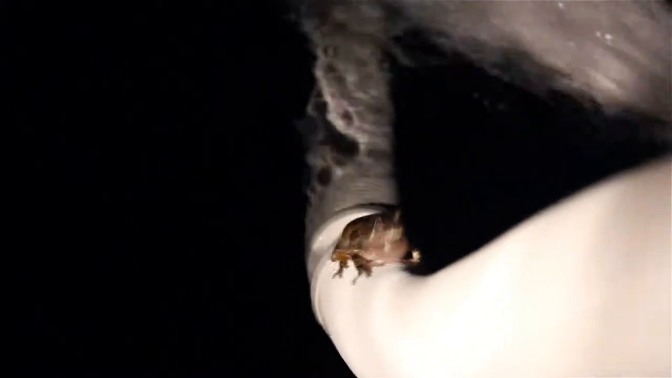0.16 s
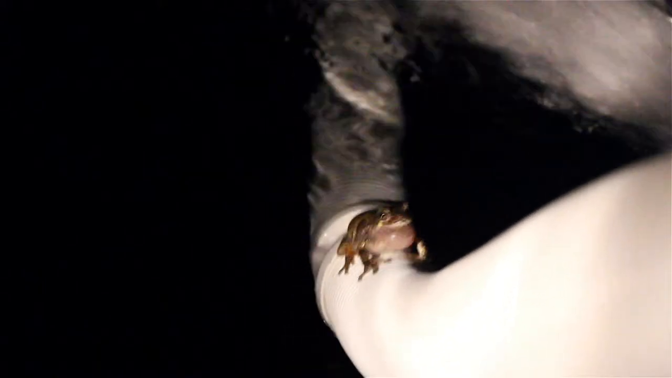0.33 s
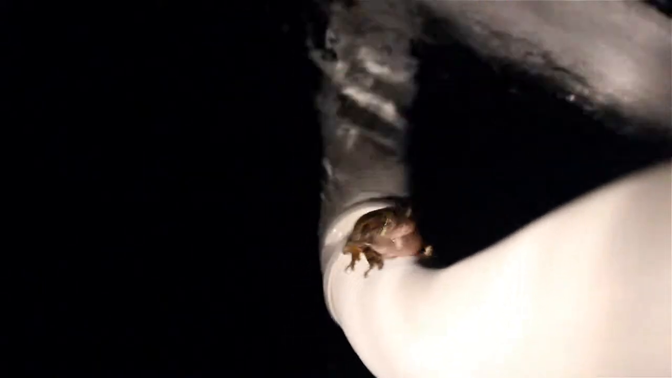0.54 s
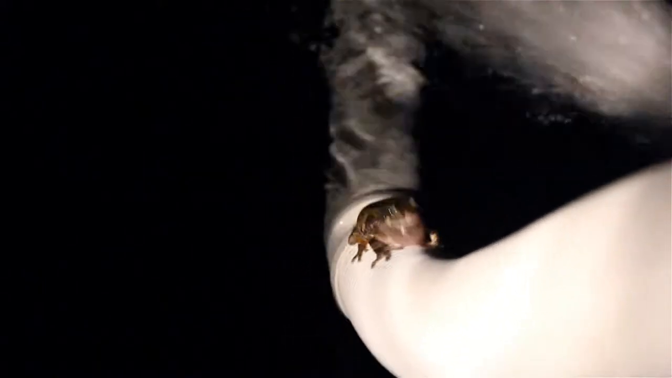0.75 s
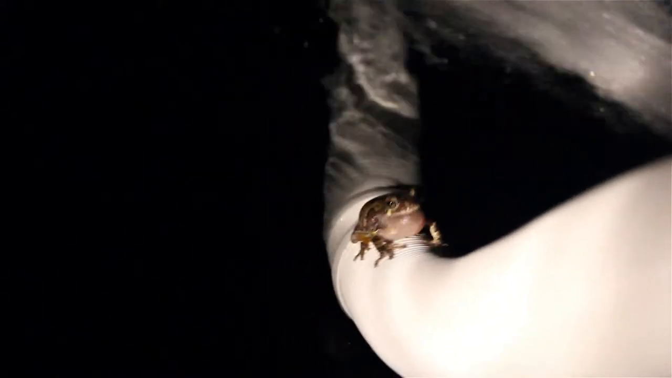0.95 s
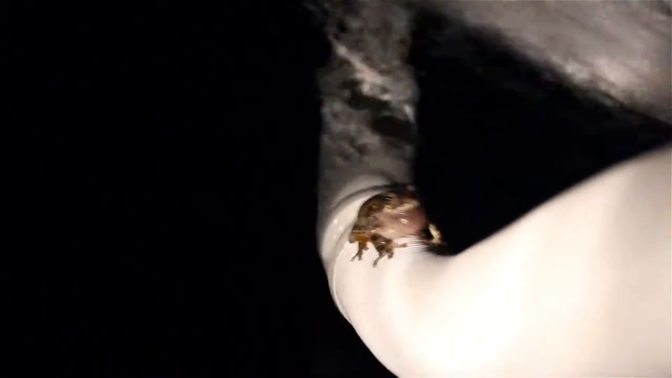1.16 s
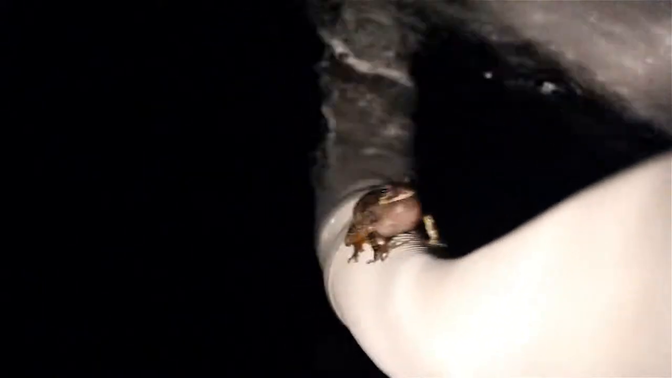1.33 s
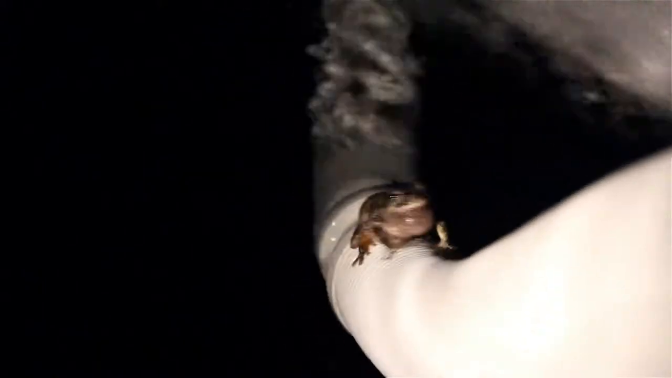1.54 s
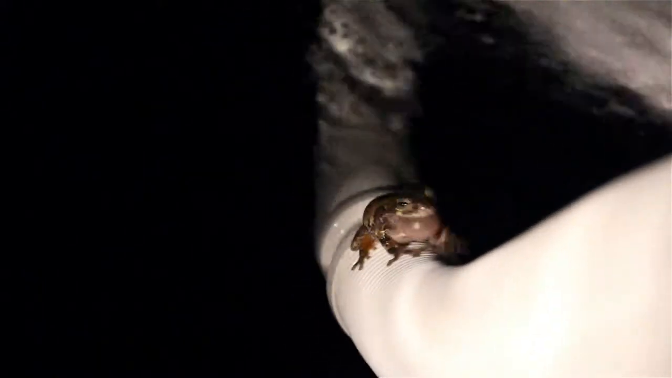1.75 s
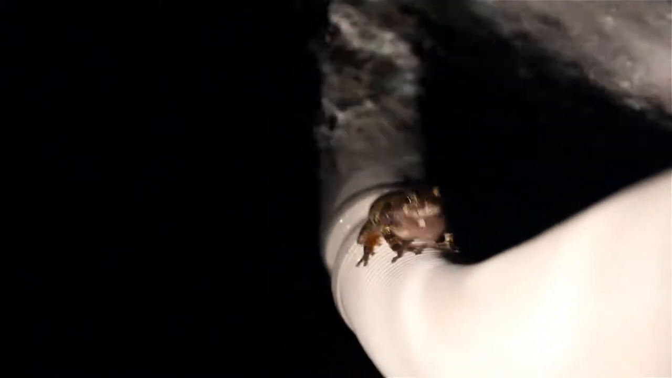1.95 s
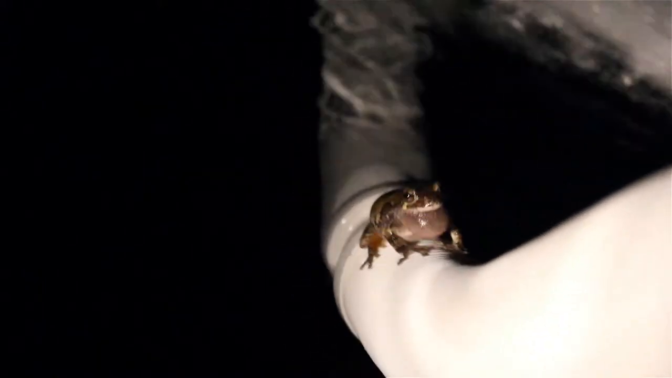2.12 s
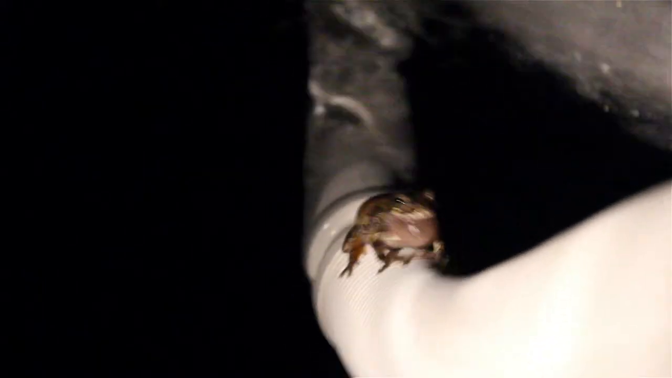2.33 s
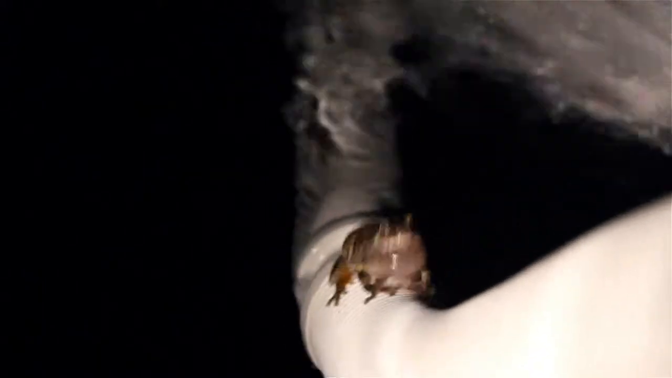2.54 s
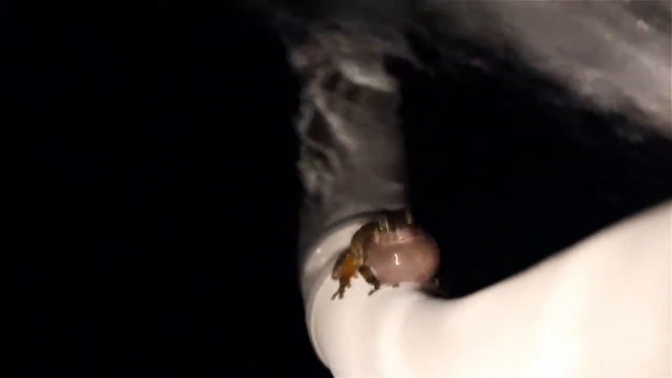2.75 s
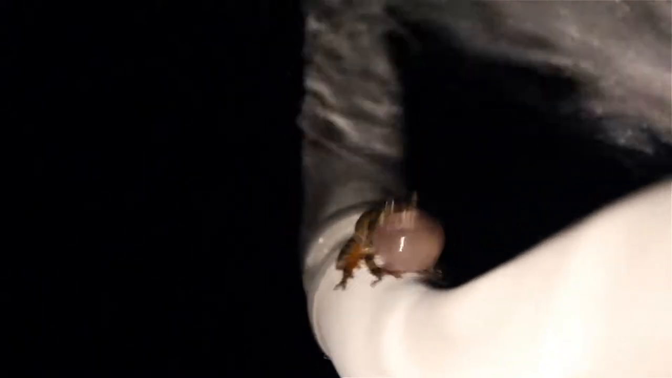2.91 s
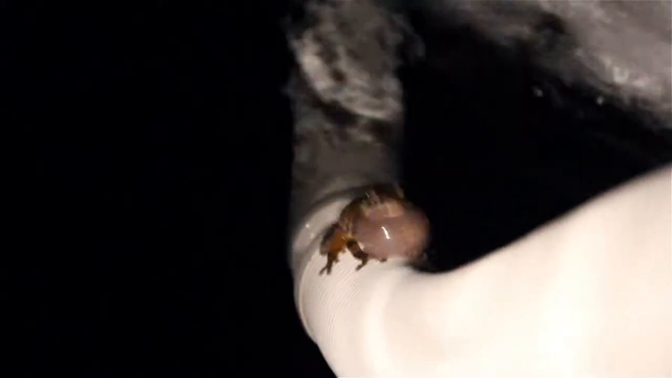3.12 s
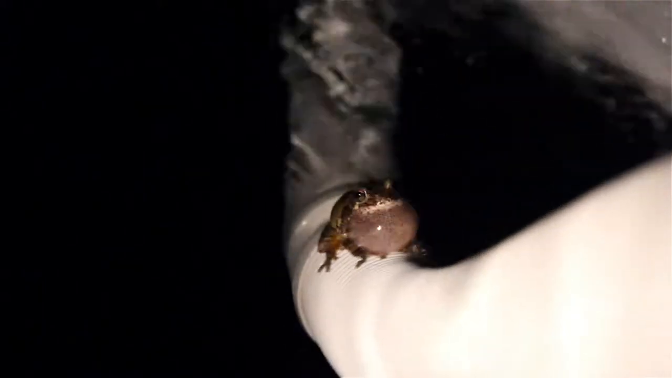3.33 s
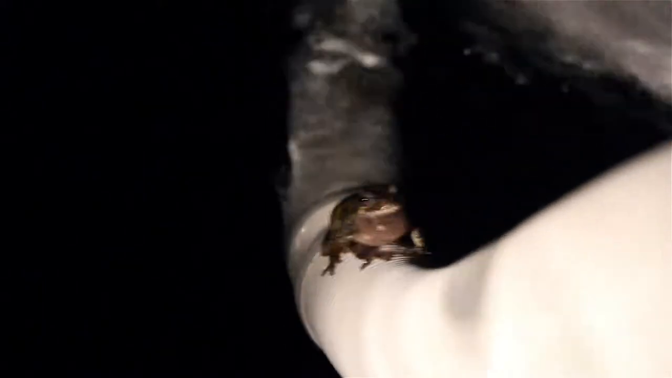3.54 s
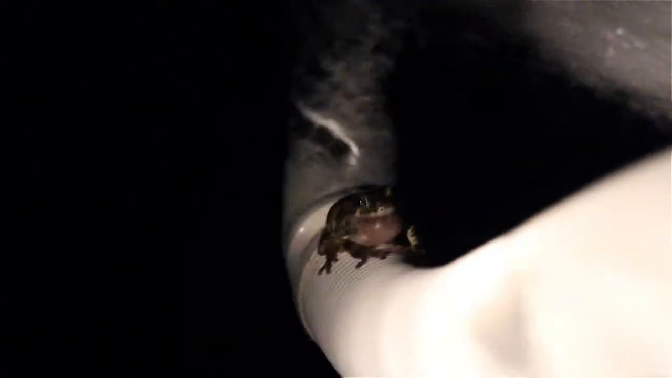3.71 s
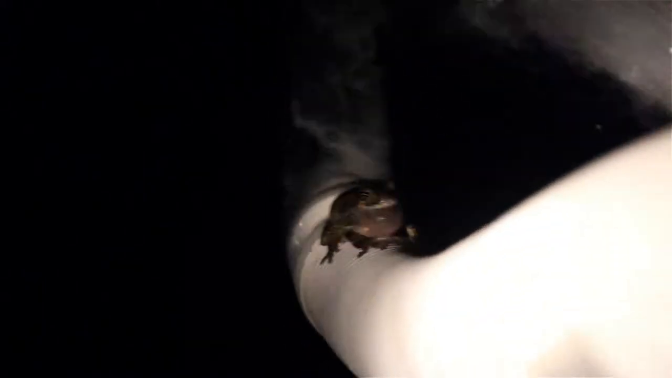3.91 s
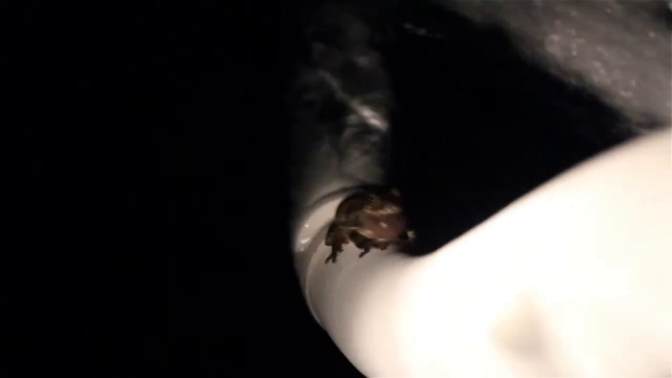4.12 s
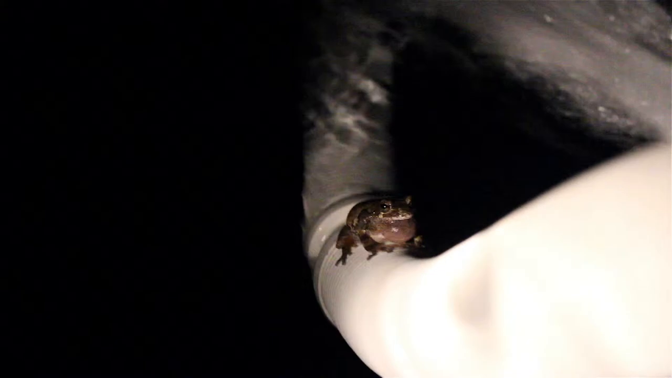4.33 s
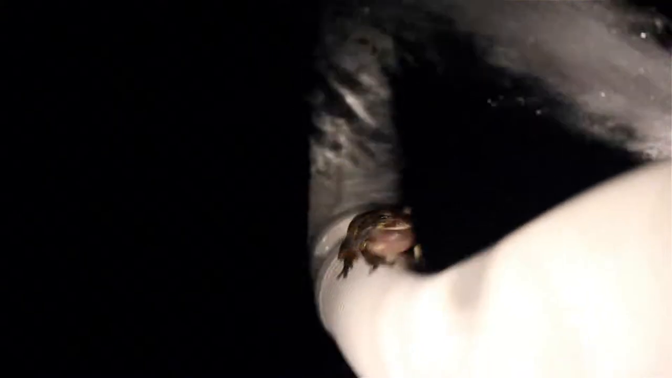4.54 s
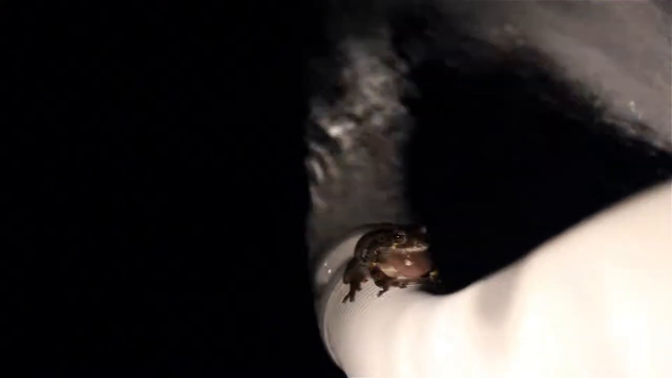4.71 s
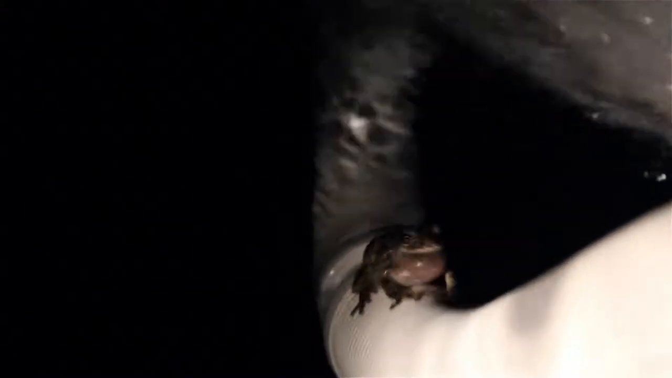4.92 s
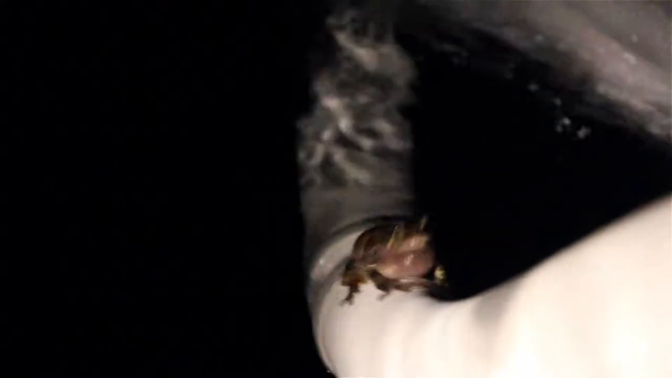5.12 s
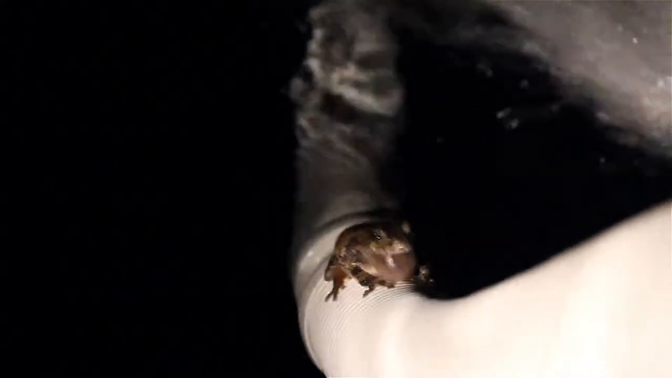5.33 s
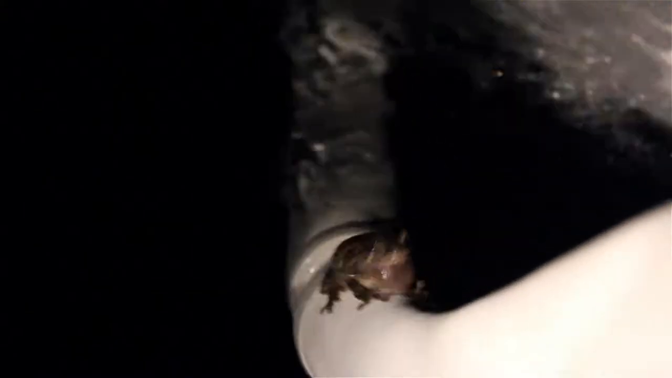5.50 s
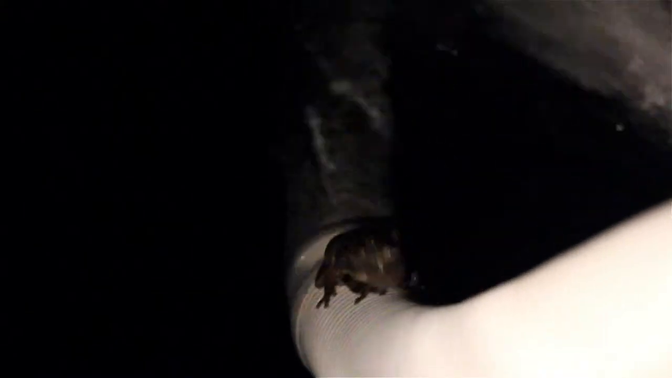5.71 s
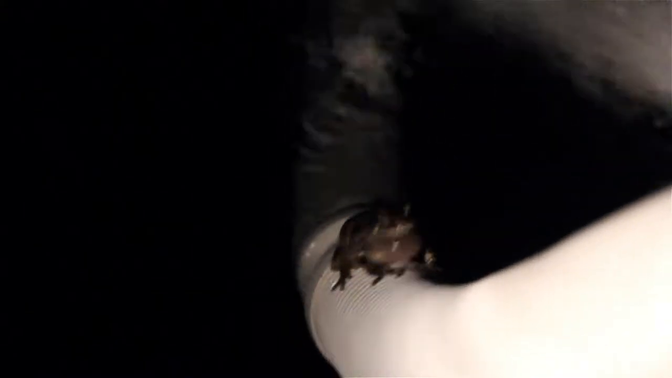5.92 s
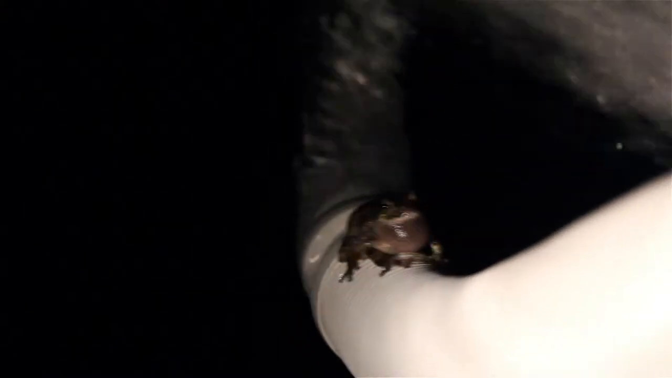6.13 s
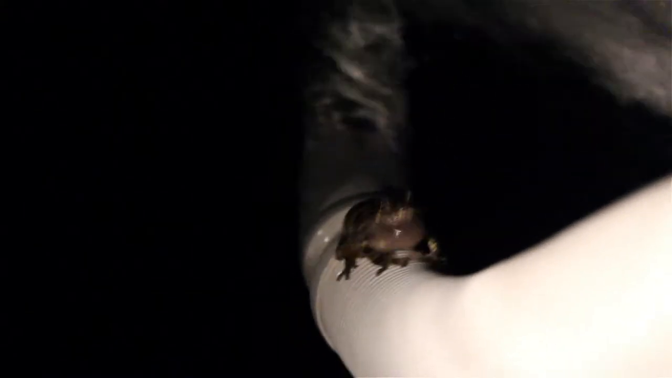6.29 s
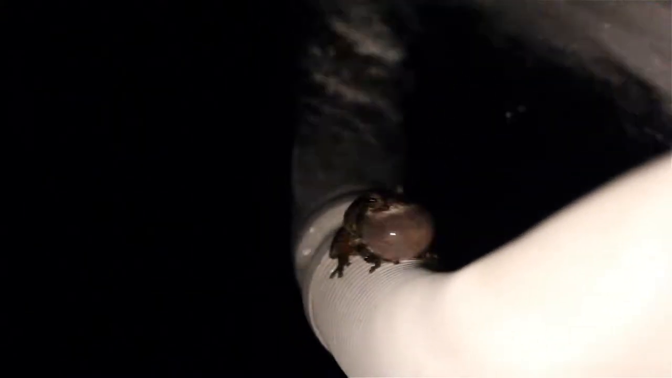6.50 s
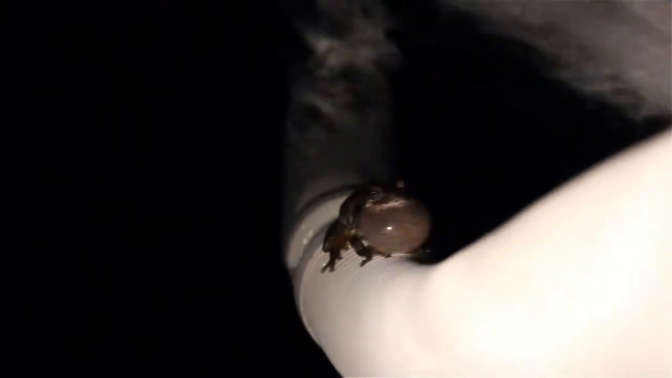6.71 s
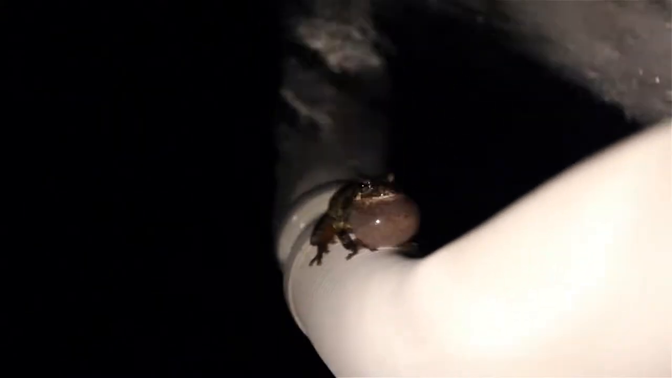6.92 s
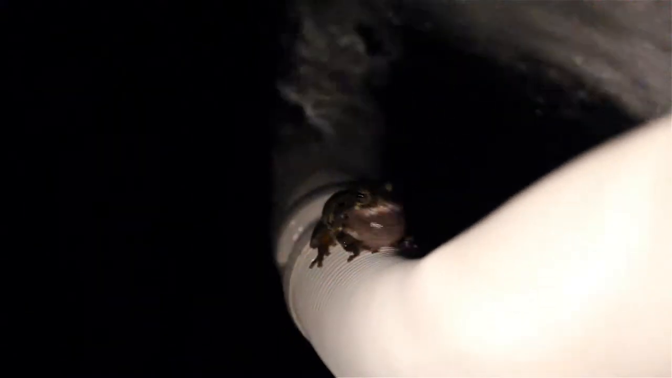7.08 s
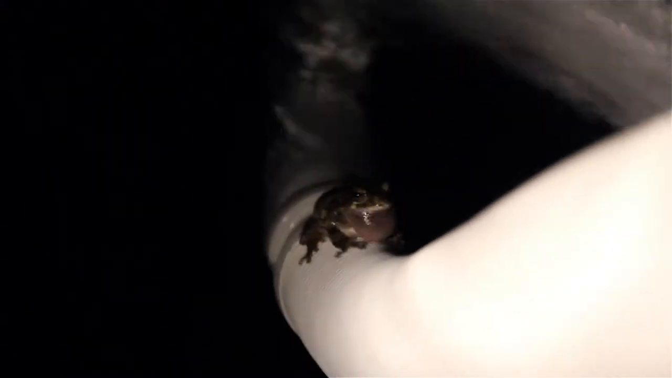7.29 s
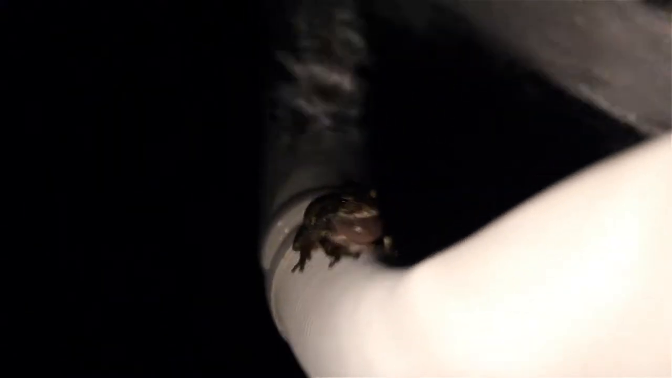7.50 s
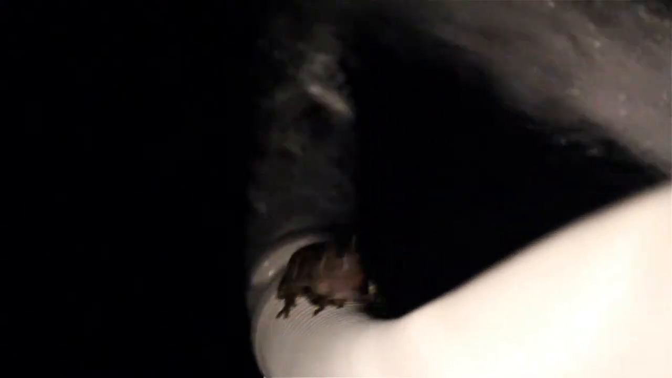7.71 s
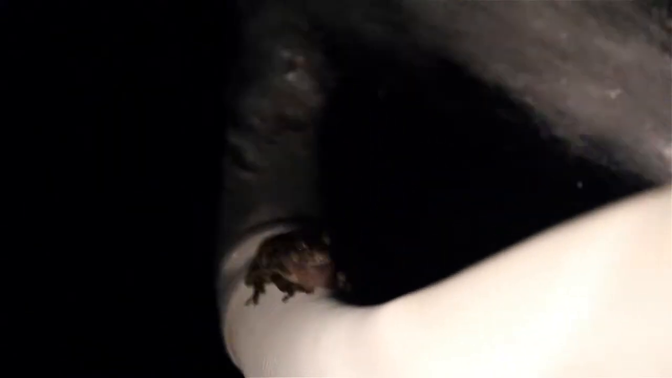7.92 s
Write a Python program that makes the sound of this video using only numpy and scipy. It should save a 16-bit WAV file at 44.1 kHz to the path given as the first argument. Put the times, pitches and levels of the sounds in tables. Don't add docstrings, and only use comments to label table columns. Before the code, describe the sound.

A frog gives two loud, fast, bright trills at night while a softer frog answers almost together, over trickling, dripping, splashing pool water.

```python
import sys
import numpy as np
from scipy import signal
from scipy.fft import rfft, irfft, next_fast_len
from scipy.io import wavfile
from scipy.ndimage import uniform_filter1d, map_coordinates

SR = 44100
rng = np.random.default_rng(int(sys.argv[2]) if len(sys.argv) > 2 else 0)


def wav_out(sig):
    wavfile.write(sys.argv[1], SR, np.round(np.clip(np.atleast_2d(sig).T, -1, 1) * 32767).astype(np.int16))


def invert_db(x):
    u = np.asarray(x, float) / 20
    return 10 ** u


N = 350595

# [f/Hz, rms level/dB, unsteadiness/1]
PUMP_TONES = [(121, -64, 0.21), (293.2, -60, 0.5), (420.4, -62, 0.46), (59.8, -75.5, .3)]
# [f/Hz, level per Hz/dB]
RUSH_SPECTRUM = [(12, -61), (20, -38), (90, -14), (113, -10.5), (145, -12.5), (226, -6.5), (260, -10.5),
                 (290, -6), (384, -11), (417, -12), (583, -1.5), (962, -5.5), (1630, -7), (3560, -8),
                 (15600, -31)]
# [f/Hz, width/Hz, level/dB]
POOL_HOLLOWS = [(563, 81, -13), (1640, 630, -3.5), (3000, 140, -12.5), (236, 42, -11)]
# [t/s, peak level/dB, low f/Hz, high f/Hz, length/s]
HARD_TICKS = [(.657, -42, 6000, 9000, .003), (1.356, -30, 7550, 13000, 0.0022),
              (2.054, -43, 4500, 7000, .003), (2.065, -26.5, 5000, 5450, 0.0063),
              (2.067, -30, 5500, 7100, 0.0037), (2.411, -40, 6500, 9000, .003),
              (3.064, -39, 11000, 15500, .004), (3.082, -37, 8040, 13200, 0.0033),
              (3.912, -35, 6500, 8500, 0.0027), (4.163, -29, 3500, 5000, 0.0025),
              (4.27, -37, 7000, 14500, .003), (4.306, -39, 4700, 5600, 0.0045),
              (4.335, -44, 9000, 13500, .003), (4.442, -33, 4800, 6500, .003),
              (4.453, -38, 7500, 10000, 0.0027), (4.5, -41, 7000, 9500, .003),
              (7.076, -30.5, 3500, 15000, 0.012), (7.077, -26, 5700, 6650, 0.0069),
              (7.599, -31, 6960, 9400, 0.0026)]
# [t/s, peak level/dB, f/Hz, splash level/dB]
LARGE_DROPS = [(0.094, -29, 530, 3), (0.104, -29, 1640, -8), (0.116, -34, 1570, -3), (0.122, -24, 483, 1),
               (0.614, -30, 600, -9), (0.653, -22, 560, -9), (0.696, -18.5, 567, -17), (1.0, -33, 535, 0.5),
               (1.852, -26.5, 538, 5.5), (1.909, -32, 573, -9), (2.062, -24, 530, 1),
               (2.084, -21, 303, -12), (2.127, -33, 537, 4.5), (2.301, -27, 777, -1.5),
               (2.332, -20, 1610, -13), (3.582, -24, 558, -3), (3.609, -22, 556, -2.5),
               (3.927, -27, 1554, -1.5), (4.21, -24, 560, -12), (4.994, -31, 596, -2),
               (5.138, -26, 619, -16), (5.399, -19.5, 544, -3), (5.732, -29, 1420, -14),
               (5.809, -19, 1350, -14), (5.99, -26, 606, -11), (6.207, -29, 783, -8), (6.42, -22, 576, -1),
               (6.498, -21, 670, 1.5), (7.078, -21, 563, 0), (7.447, -30, 624, -13)]
# [multiple/1, level/dB, lean towards the pulse's end/1, growth with effort/1]
FAR_OVERTONES = [(1, -14.5, 1, 0.15), (2, -1.3, 0.077, 0.74), (3, -24, .5, 1.3)]
NEAR_OVERTONES = [(1, -10, 1.5, .2), (2, 0.1, .45, 1.0), (3, -28, 1.6, 1.01), (4, -33, -.5, 1.01),
                  (7, -27, .8, 1.01)]
# [first pulse t/s, pulses/1, first gap/ms, drag on the last gap/ms]
FAR_CALLS = [
    (2.6227, 44, 19.98, 1.39),
    (7.1157, 39, 20.6, 0),
]
NEAR_CALLS = [
    (2.6053, 39, 19.04, 5.64),
    (6.4331, 33, 19.21, 2.2),
]
# [full level/dB, first pulse below full/dB, pulses to swell/1]
FAR_RISES = [
    (-19.5, 15.5, 3.4),
    (-20.5, 8.9, 4),
]
NEAR_RISES = [
    (-11.5, 49.5, 4.77),
    (-12, 27, 3.1),
]


def unit(x):
    return x / np.sqrt(np.mean(x ** 2) + 1e-20)


def wobble(rate):
    knots = rng.standard_normal(int(N * rate / SR) + 4)
    return map_coordinates(knots, [np.arange(N) * rate / SR])


def filtered(x, response):
    m = next_fast_len(N + SR // 2)
    return irfft(rfft(x, m) * response(np.fft.rfftfreq(m, 1 / SR)), m)[:N]


def resonance(f, hz, width_hz):
    return 1j * f * width_hz / (hz * hz - f * f + 1j * f * width_hz)


def place(times, sounds):
    start = np.round(np.asarray(times) * SR).astype(int)[:, None]
    at = start + np.arange(sounds.shape[1])
    return np.bincount(np.clip(at, 0, N).ravel(), sounds.ravel(), N + 1)[:N]


def pump():
    t = np.arange(N) / SR
    hum = 0
    for hz, db, shake in PUMP_TONES:
        size = invert_db(db + 2.5 + 5.9 * shake * wobble(4.8))
        hum = hum + size * np.sin(2 * np.pi * hz * t + 2.56 * shake * wobble(12))
    return hum


def grains(count, low_hz, high_hz, cycles, spread_db):
    chance = rng.random((count, 3))
    hz = low_hz * (high_hz / low_hz) ** chance[:, 1:2]
    life = hz * np.arange(int(2 * cycles * SR / low_hz))[None] / SR / cycles
    size = invert_db(-spread_db * np.log(1 - .985 * chance[:, 2:])) * np.sqrt(hz)
    swell = life * np.exp(-5 * life)
    return unit(place(chance[:, 0] * N / SR, size * np.sin(2 * np.pi * cycles * life) * swell))


def water():
    z = signal.stft(rng.standard_normal(N), nperseg=512)[2]
    patches = uniform_filter1d(uniform_filter1d(rng.standard_normal(z.shape), 8, 0), 6, 1)
    rush = unit(signal.istft(z * invert_db(0.78 * unit(patches)), nperseg=512)[1][:N])
    spray = invert_db(1.5 * wobble(12) + 6 * np.tanh(.55 * wobble(35)))
    fizz = unit(spray * grains(count=6000, low_hz=6000, high_hz=18200, cycles=2.6, spread_db=4.5))
    gurgle = grains(count=2000, low_hz=652.0, high_hz=3500, cycles=10.9, spread_db=2.5)
    f, level_db = np.transpose(RUSH_SPECTRUM)

    def colour(hz):
        hollows = sum(invert_db(db) * abs(resonance(hz, c, width)) ** 2 for c, width, db in POOL_HOLLOWS)
        return invert_db(np.interp(np.log(hz + 1), np.log(f), level_db)) * (1 + hollows)

    flow_db = -46 + 0.28 * wobble(1.38)
    surge = invert_db(flow_db + .3 * wobble(5) + .6 * wobble(16))
    return invert_db(7.0) * surge * unit(filtered(rush + 0.37 * fizz + 0.14 * gurgle, colour))


def ticks():
    s, db, low_hz, high_hz, length_s = (c[:, None, None] for c in np.transpose(HARD_TICKS))
    t = np.arange(int(.015 * SR)) / SR
    chance = rng.random((len(s), 2, 24, 1))
    hz = low_hz + (high_hz - low_hz) * chance[:, 0]
    burst = np.sin(np.pi * np.clip(t / length_s, 0, 1))
    spit = invert_db(db - 16.5) * burst * np.sin(2 * np.pi * (hz * t + chance[:, 1]))
    return place(s.ravel(), spit.sum(axis=1))


def drips():
    hollow_hz = (567, 600, 742, 1433)
    rows = []
    for when, strength, pick in rng.random((20, 3)):
        db = -31.5 - 3 * (2 * strength - 1)
        rows.append((when * N / SR, db, hollow_hz[int(pick * len(hollow_hz))], -2.5))
    return rows


def thuds():
    s, db, hz, splash_db = (c[:, None] for c in np.transpose(list(LARGE_DROPS) + drips()))
    t60_s = 0.059 * invert_db(0.39 * (-27.5 - db))
    t = np.arange(int(.12 * SR))[None] / SR
    swell = invert_db(-60 * t / t60_s) * (1 - np.exp(-t / .0045)) ** 2
    drift = np.cumsum(rng.standard_normal(swell.shape), axis=1) * 0.026
    ring = invert_db(db + 1.5) * swell * np.sin(2 * np.pi * hz * t + drift)
    splash = invert_db(db + splash_db + 9.5) * swell * rng.standard_normal(swell.shape)

    def dull(f):
        return resonance(f, 1050, 2200) ** 2 + 1.28 * resonance(f, 345, 160)

    return place(s[:, 0], ring) + filtered(place(s[:, 0], splash), dull)


def pulses(trills, swells, steady_ms, share, abruptness):
    rows = []
    for (first_s, count, quick_ms, drag_ms), (full_db, soft_db, swell) in zip(trills, swells):
        k = np.arange(count)
        gap_ms = steady_ms + (quick_ms - steady_ms) * np.exp(-k / 16)
        gap_ms = gap_ms + drag_ms * share ** k[::-1]
        s = first_s + (np.cumsum(gap_ms) - gap_ms[0]) / 1000
        s = s + .0002 * rng.standard_normal(count)
        rows += zip(s, full_db - soft_db * np.exp(-(k / swell) ** abruptness))
    return np.array(rows)


def trill(beats, voice, low_hz, high_hz, length_s, flatness, full_db):
    s, db = np.transpose(beats)
    effort_db = db[:, None] - full_db
    lasts_s = length_s * np.clip(1 + 0.024 * effort_db, .6, 1)
    t = np.arange(int(length_s * SR)) / SR
    u = np.clip(.5 + (t - length_s / 2) / lasts_s, 0, 1)
    chance = rng.standard_normal((len(s), 12))
    glide_hz = (high_hz - low_hz) * np.clip(1 + .02 * effort_db, .5, 1)
    pitch_hz = (low_hz + glide_hz * u ** 1.1) * (1 + .0035 * chance[:, :1])
    phase = 2 * np.pi * np.cumsum(pitch_hz * (u > 0), axis=1) / SR + 0.15 * chance[:, 1:2]
    shape = np.tanh(flatness * np.sin(np.pi * u) ** 2) / np.tanh(flatness)
    sound = 0
    for k, (multiple, level_db, lean, growth) in enumerate(voice):
        size = invert_db(full_db + growth * effort_db + level_db + .5 * chance[:, k + 2:k + 3])
        leaning = shape * np.exp(lean * (u - .5))
        sound = sound + size * leaning * np.sin(round(multiple) * phase + k)
    return place(s - length_s / 2, sound)


def nearby(x, t60_s, delay_s):
    t = np.arange(int(.15 * SR)) / SR
    tail = rng.standard_normal(len(t)) * invert_db(-60 * t / t60_s) * (t > delay_s)
    return signal.fftconvolve(x, tail / np.linalg.norm(tail))[:N]


def far_frog():
    beats = pulses(FAR_CALLS, FAR_RISES, steady_ms=22.4, share=.8, abruptness=.9)
    cords = trill(beats, FAR_OVERTONES, low_hz=1032, high_hz=1312, length_s=.0112, flatness=1.3, full_db=-20.5)

    def sac(f):
        return 1 + 0.64 * resonance(f, 1209, 44) + 3.7 * resonance(f, 1456, 120)

    def late(f, delay_s):
        return np.exp(-2j * np.pi * f * delay_s)

    def wall(f):
        return late(f, .00903) * (.84 * resonance(f, 2250, 330) + .85 * resonance(f, 1200, 600))

    def corner(f):
        return late(f, .0173) * .5 * resonance(f, 1215, 500) ** 2

    call = invert_db(-0.5) * filtered(cords, sac)
    echoes = invert_db(-16) * nearby(call, t60_s=.09, delay_s=.004)
    lingering = filtered(echoes, lambda f: 1 + 1.6 * resonance(f, 1230, 450))
    return call + filtered(call, wall) + filtered(call, corner) + lingering


def rasp(beats, length_s):
    puff = np.hanning(int(length_s * SR))
    noise = puff * rng.standard_normal((len(beats), len(puff)))
    air = place(beats[:, 0] - length_s / 2, invert_db(beats[:, 1:] - 26) * noise)
    return filtered(air, lambda f: resonance(f, 3300, 2500))


def near_frog():
    beats = pulses(NEAR_CALLS, NEAR_RISES, steady_ms=21.3, share=.3, abruptness=1.9)
    cords = trill(beats, NEAR_OVERTONES, low_hz=1098, high_hz=1385, length_s=.0091, flatness=2.4, full_db=-12.5)
    call = invert_db(-1.5) * filtered(cords, lambda f: np.where(f < 6500, 1, resonance(f, 8470, 150)))
    sac = invert_db(-4) * filtered(call, lambda f: resonance(f, 1494, 78))
    echoes = invert_db(-22) * nearby(call, t60_s=.07, delay_s=.003)
    lingering = filtered(echoes, lambda f: 1 + 3.8 * resonance(f, 1400, 450))
    return call + sac + rasp(beats, length_s=0.012) + lingering


def scene():
    return (pump() + water() + ticks() + thuds() + far_frog() + near_frog())[None]


def band_limit(x):
    return signal.sosfilt(signal.butter(12, 15760, fs=SR, output="sos"), x)


def record(dry):
    hiss = invert_db(-55.8) * rng.standard_normal(N) * invert_db(.8 * wobble(8) + 1.3 * wobble(90))
    mix = filtered(dry[0] + hiss, lambda hz: hz < 15800)
    return band_limit(mix[None])


dry = scene()
out = record(dry)
wav_out(out)
```